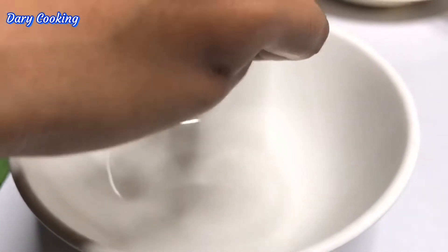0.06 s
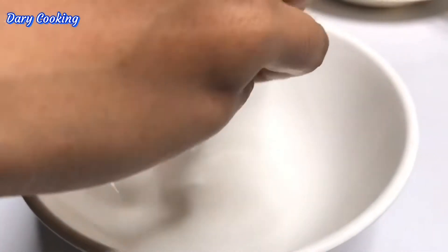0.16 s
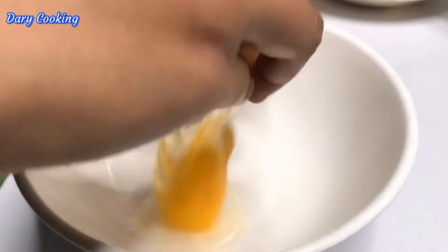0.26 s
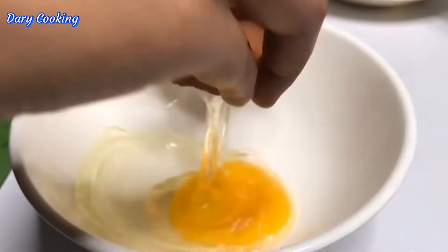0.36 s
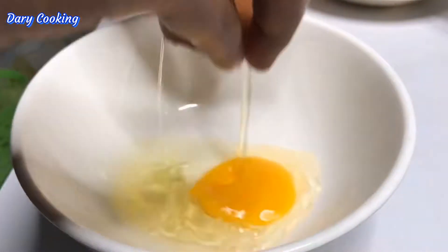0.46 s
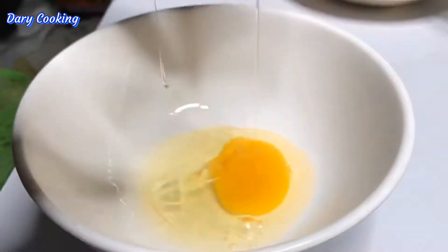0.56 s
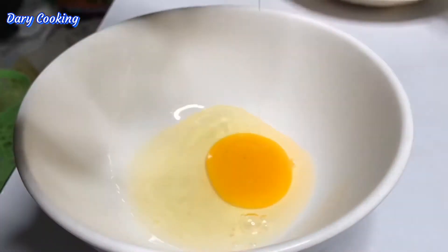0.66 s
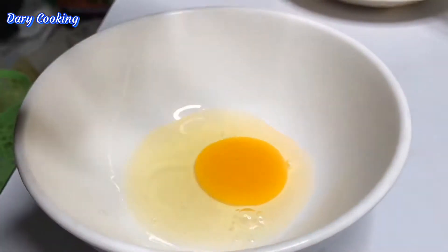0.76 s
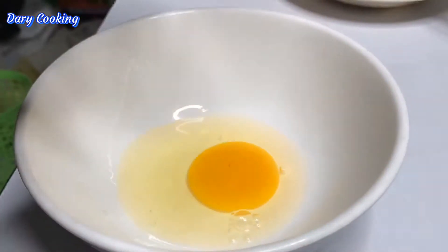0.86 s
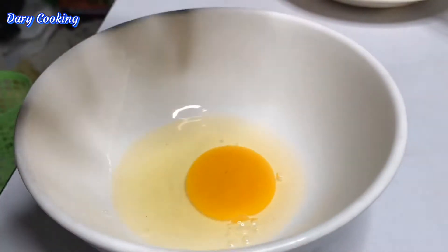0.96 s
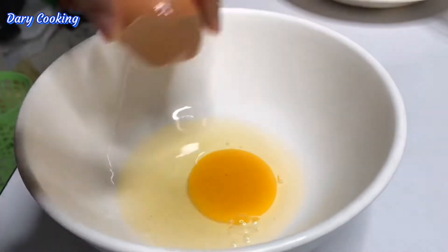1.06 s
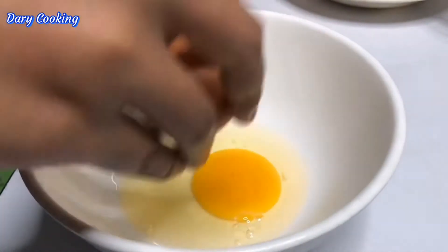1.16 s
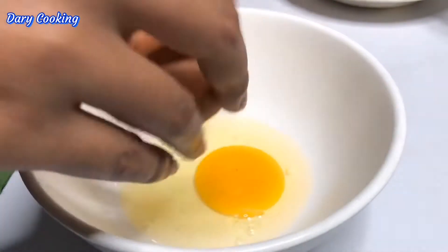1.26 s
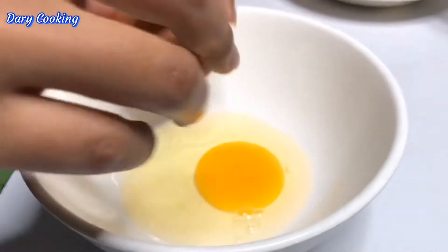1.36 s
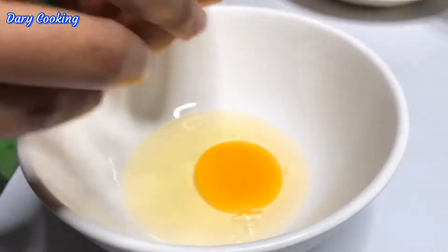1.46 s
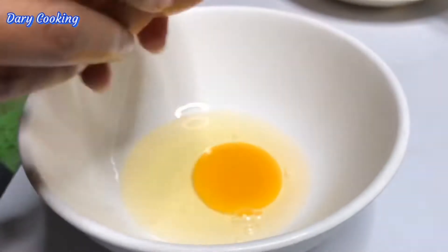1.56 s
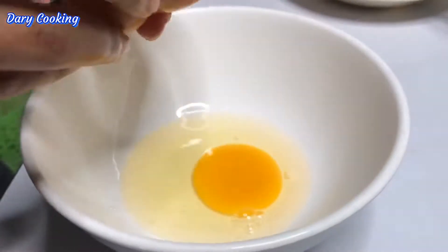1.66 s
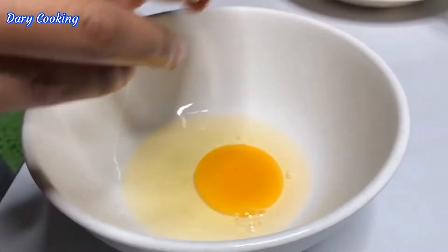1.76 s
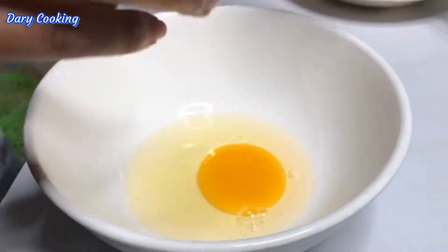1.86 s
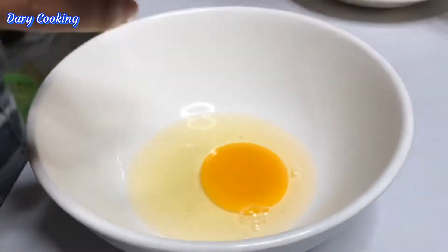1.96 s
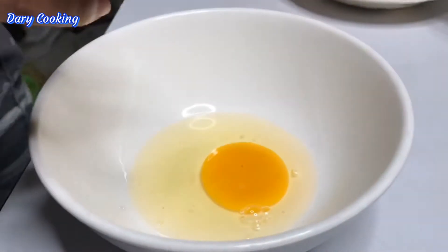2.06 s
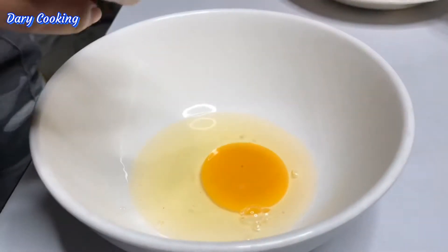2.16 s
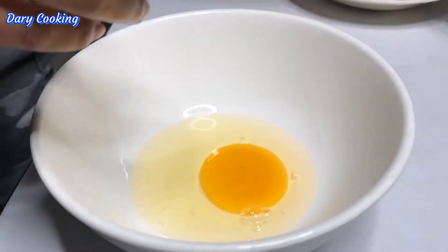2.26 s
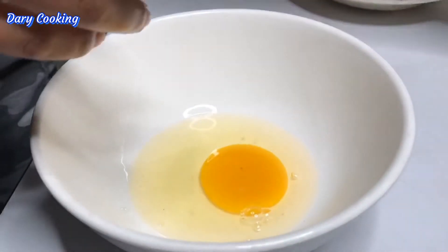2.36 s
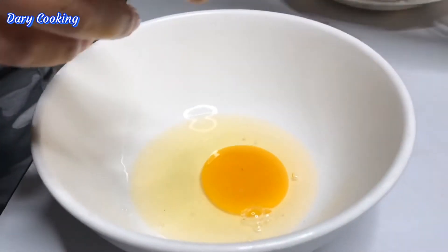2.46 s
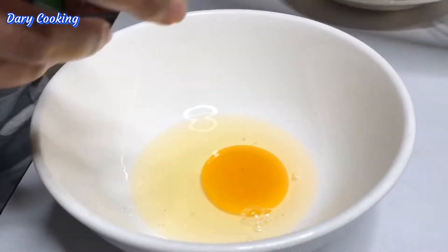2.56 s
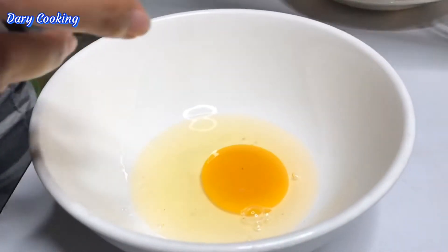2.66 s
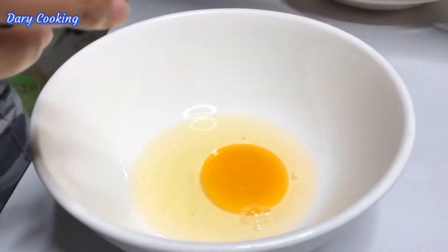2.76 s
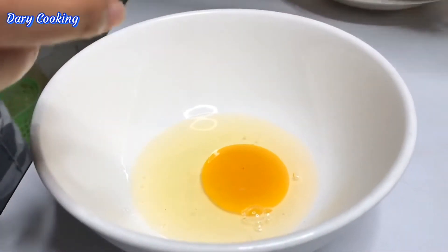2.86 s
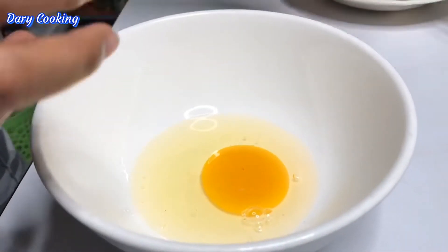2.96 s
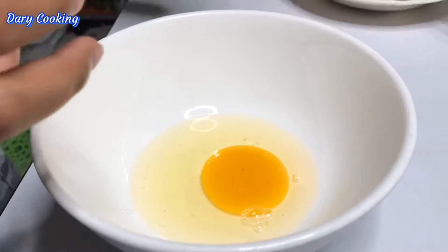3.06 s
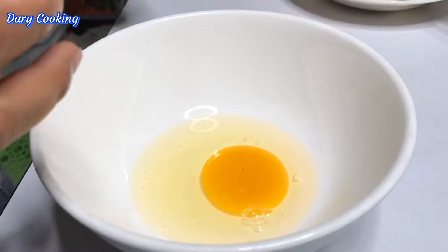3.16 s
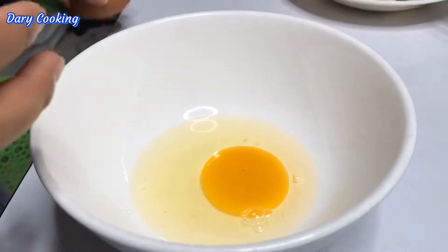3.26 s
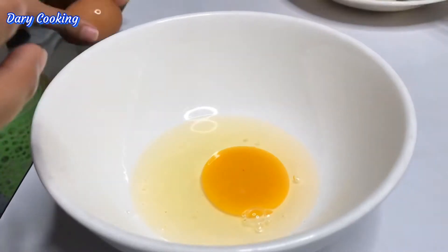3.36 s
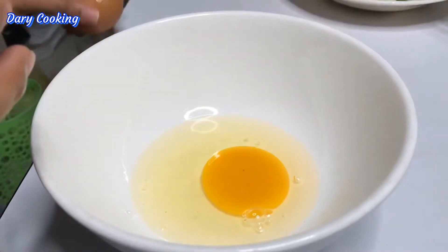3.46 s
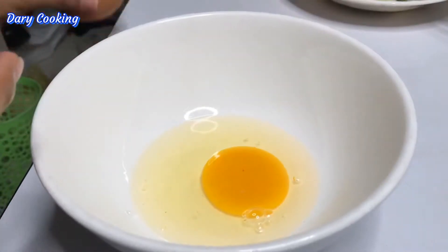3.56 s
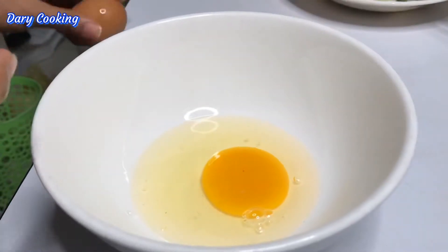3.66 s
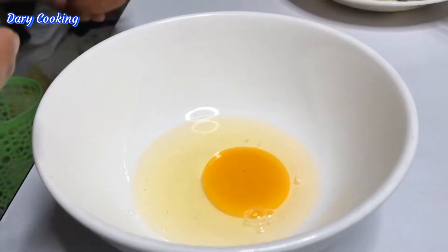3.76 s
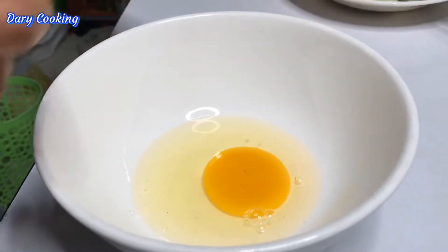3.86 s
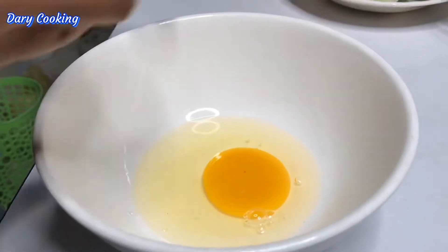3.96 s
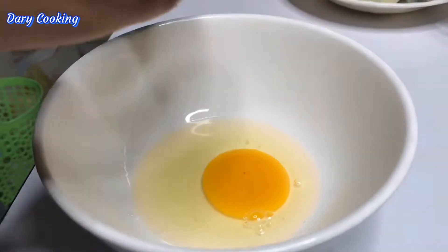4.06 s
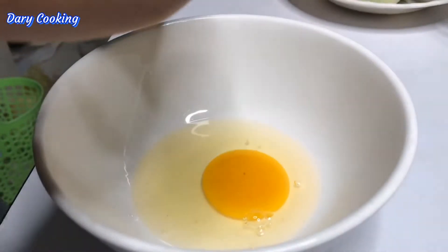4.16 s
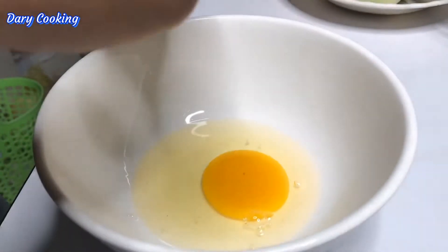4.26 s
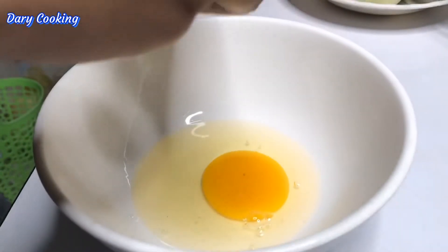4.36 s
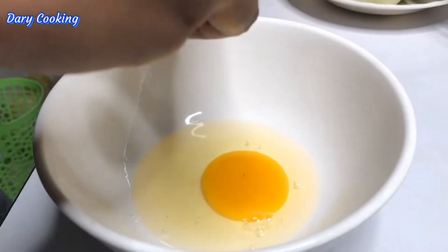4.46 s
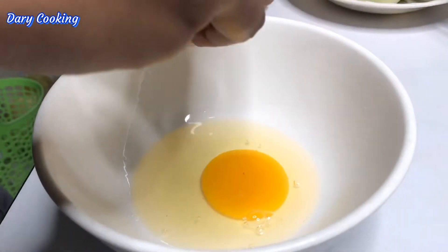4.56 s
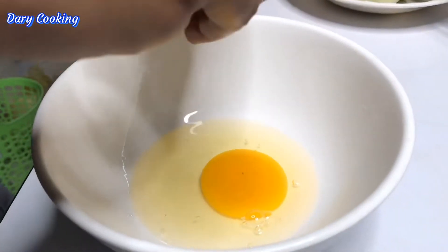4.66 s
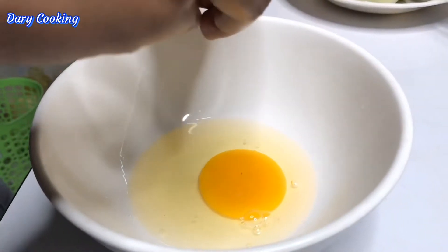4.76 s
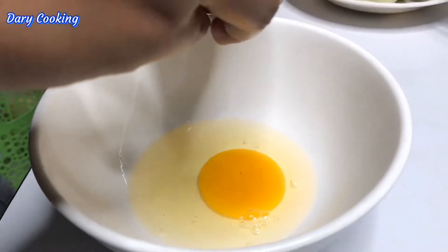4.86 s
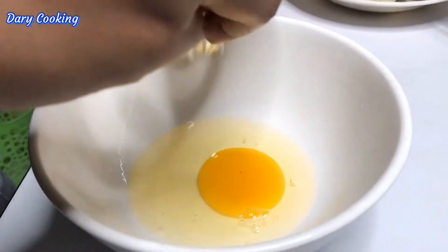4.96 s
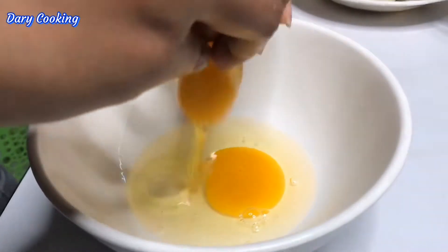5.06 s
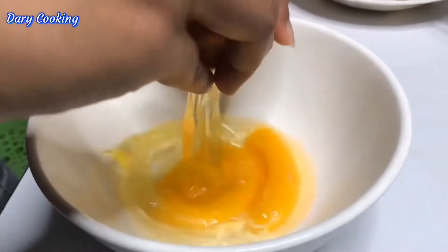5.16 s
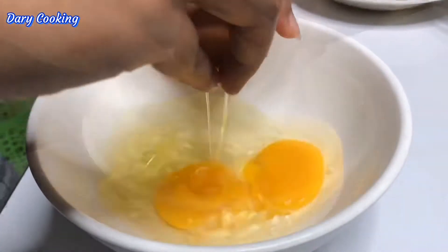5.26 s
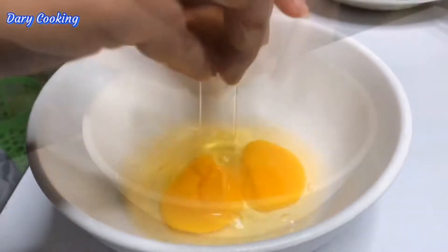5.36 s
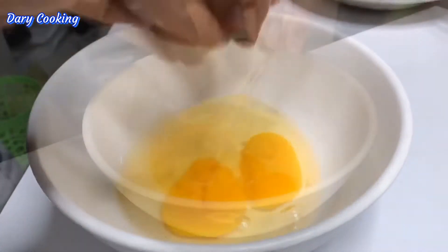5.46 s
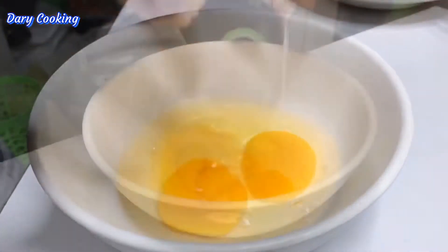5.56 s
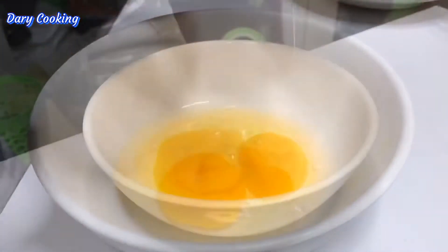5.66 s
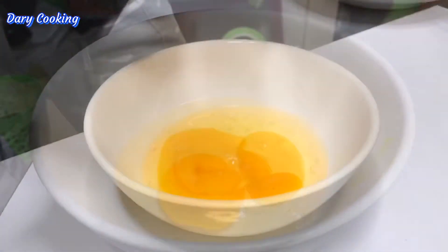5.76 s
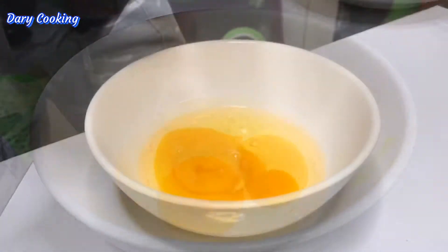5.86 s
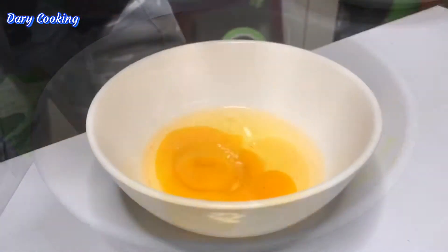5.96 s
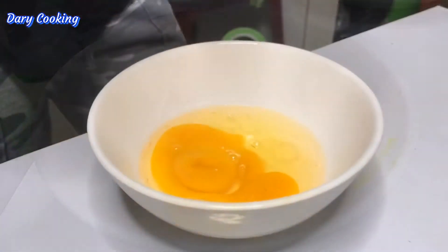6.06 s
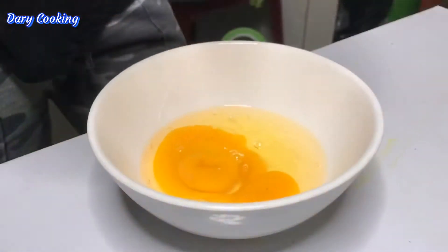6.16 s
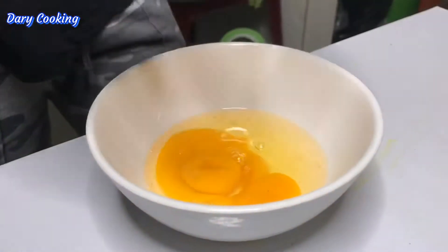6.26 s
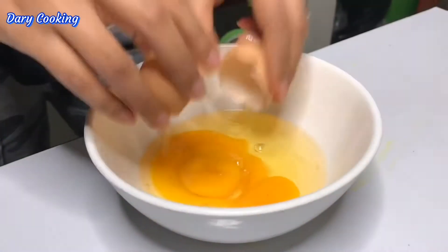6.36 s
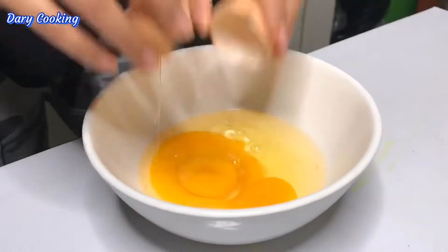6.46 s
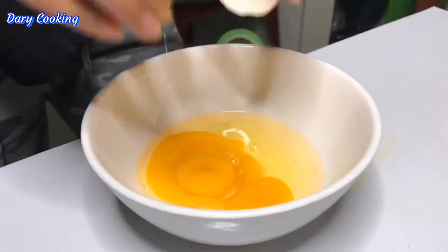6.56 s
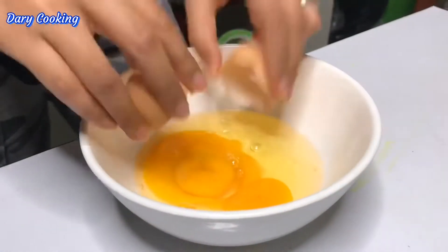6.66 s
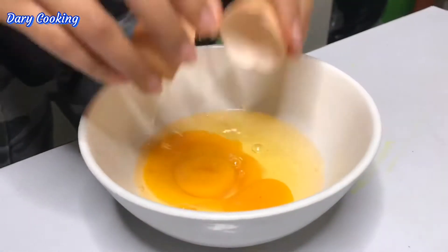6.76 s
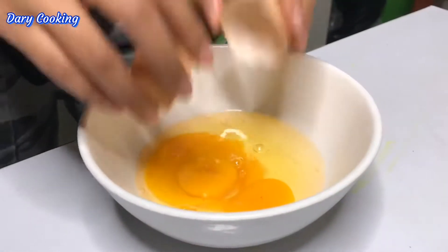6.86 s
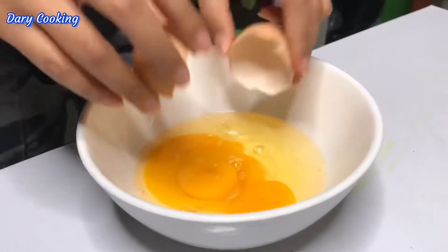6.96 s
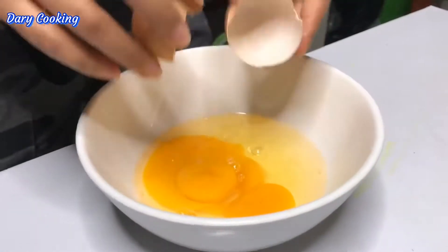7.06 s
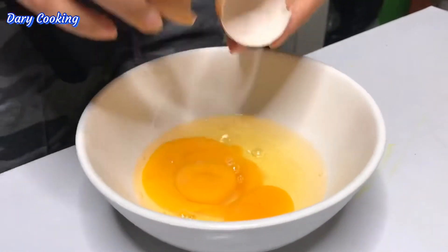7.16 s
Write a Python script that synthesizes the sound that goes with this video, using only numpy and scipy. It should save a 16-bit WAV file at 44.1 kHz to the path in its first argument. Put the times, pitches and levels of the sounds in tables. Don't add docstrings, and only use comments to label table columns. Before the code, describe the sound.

Close up in a small kitchen, an egg is knocked twice, its shell cracks open crisply, the yolk plops into a bowl and shells crackle.

```python
import sys
import numpy as np
from scipy import signal
from scipy.fft import rfft, irfft, next_fast_len
from scipy.io import wavfile
from scipy.ndimage import uniform_filter1d, map_coordinates

SR = 44100
rng = np.random.default_rng(int(sys.argv[2]) if len(sys.argv) > 2 else 0)


def wav_out(sig):
    wavfile.write(sys.argv[1], SR, np.round(np.clip(np.atleast_2d(sig).T, -1, 1) * 32767).astype(np.int16))


def linear_from_db(decibels):
    return 10 ** (np.asarray(decibels, float) / 20)


N = 317719

# (time [s], peak [dB], ring [Hz], brittle top above ring [dB])
SNAPS = [(0.0681, -32, 1540, -12), (0.069, -39, 3250, -9), (0.205, -43, 2800, -9), (0.168, -54, 2400, 26),
         (0.2165, -26, 1930, -0.5), (0.221, -32, 1750, -20), (0.2394, -41, 2780, -23),
         (0.2898, -34.5, 3420, 1.5), (0.951, -47, 1940, -3), (1.1563, -37.5, 1940, 8),
         (1.2672, -41, 1290, -3), (1.401, -29, 2780, -2), (1.4055, -23.5, 2940, 4.5),
         (1.4053, -31, 2130, -9), (1.4125, -33, 2180, -9), (1.4225, -32.5, 2100, -9), (1.412, -24, 2800, 1),
         (1.443, -36, 2280, 9), (1.453, -38, 2200, 6), (1.461, -39, 2600, 6), (1.422, -24, 2800, -1),
         (1.4268, -27, 2760, -2), (1.439, -35.5, 2870, 7), (1.4478, -31.5, 2840, 0), (1.6284, -29, 2090, 9),
         (1.628, -36, 3010, 5), (1.912, -45, 2210, -15), (2.36, -45, 3280, -18), (3.978, -43, 2160, 15),
         (4.23, -30.5, 1670, 3), (4.265, -39.5, 1848, 6), (4.2696, -42, 1580, 16.5),
         (4.289, -47.5, 2170, 12)]
# (time [s], peak [dB], ring [Hz], brittle top above ring [dB])
OPENING = [(4.7474, -44, 3670, 12.5), (4.7705, -37, 3580, -1), (4.775, -16, 3210, -5),
           (4.7865, -17, 1750, -3), (4.7925, -14.5, 2300, -8), (4.8142, -25, 1300, -14),
           (4.8367, -29, 3000, 6), (4.8075, -32, 2600, 7), (4.873, -40, 3150, 12), (4.7904, -11, 2520, 1.5),
           (4.7969, -12, 1700, -2), (4.801, -23, 2100, -2), (4.817, -23.5, 1700, 10),
           (4.819, -30, 2600, 14), (4.822, -22.5, 1540, 14.5), (4.825, -25, 1600, 13),
           (4.8283, -17, 3300, 5), (4.8484, -41, 2600, -4), (4.87, -38, 3150, 14.5),
           (4.8808, -33, 3460, 10), (4.8833, -23.5, 1620, 2), (4.889, -26, 1630, -3),
           (4.901, -22, 2300, -36), (4.905, -29, 2700, -17), (4.9103, -31, 2200, -17),
           (4.892, -32, 2600, -6), (4.886, -30, 3000, 2), (4.9157, -29, 2110, -2), (4.9487, -36, 2120, 4),
           (4.9551, -28, 3380, 0.5), (4.9722, -35.5, 2200, -5), (5.01, -47.5, 3460, 11)]
# (time [s], peak [dB], ring [Hz], brittle top above ring [dB])
EMPTIED = [(5.102, -29, 1810, 0), (5.1344, -41, 5100, -3), (5.142, -49, 5200, -12),
           (5.2021, -33.5, 1970, 5.5), (5.254, -41, 1390, 3), (5.256, -54, 4800, -9),
           (5.3742, -31.5, 2600, 4.5), (5.359, -38, 3000, 6), (5.4058, -39, 3050, 7),
           (5.412, -44, 3000, 10.5), (5.49, -48.5, 3020, 7)]
# (time [s], peak [dB], ring [Hz], brittle top above ring [dB])
DROPPED = [
    (2.0394, -43, 2100, 6),
    (2.051, -26.5, 1660, 4),
    (2.0522, -25, 2600, -1),
    (2.0565, -33, 1900, -2),
    (2.0593, -28, 2500, -2),
    (2.0735, -48, 1900, 10),
]
# (time [s], peak [dB], ring [Hz], rub t60 [s], top above ring [dB])
RUBS = [(5.065, -47, 2170, 0.07, 3), (5.924, -39, 2020, 0.18, -14), (6.358, -31.5, 2340, 0.077, -14),
        (6.518, -34, 1340, 0.17, -18), (6.5515, -35.5, 1760, 0.2, -21), (6.5994, -44, 4780, 0.07, -15),
        (6.6578, -38, 1650, 0.11, -15), (6.6853, -35, 1950, 0.21, -19), (6.772, -49, 1950, 0.07, -12),
        (6.9937, -40, 2220, 0.054, -6), (7.0594, -41.5, 3740, 0.082, -12), (7.1362, -37.5, 3800, 0.091, -1)]
# (time [s], peak [dB])
FINGER_TICKS = [(0.058, -45), (0.145, -47), (0.318, -46), (0.332, -37), (0.339, -45), (0.577, -42),
                (1.542, -40), (1.585, -40), (1.677, -39), (1.989, -44), (2.2946, -42), (2.808, -42.5),
                (4.1834, -45), (4.727, -44), (5.047, -41), (5.173, -35)]
# (peak time [s], level [dB], top above cup [dB], rise [s], fall [s])
CRUMBLE = [
    (2.049, -30.5, -1.5, 0.0089, 0.072),
    (4.24, -62, 9, 0.029, 0.13),
    (4.326, -68.5, 15.5, .025, 0.033),
    (4.793, -21.5, -1.5, 0.016, 0.019),
    (4.826, -32, 8.5, 0.037, 0.019),
    (4.887, -27.5, -15, 0.0073, 0.041),
    (4.952, -44, -21, .03, .045),
]
# (peak time [s], level [dB], top above cup [dB], rise [s], fall [s])
GRATING = [
    (1.408, -41, 3, 0.0087, .08),
    (1.445, -37, 5.5, 0.041, 0.042),
    (5.318, -44.5, 0, 0.02, 0.37),
    (5.404, -36, -3.5, 0.12, 0.038),
]
# (centre [Hz], width [Hz], level [dB])
EMPTY_CUP = [(2500, 810, -4.5), (3110, 320, 2)]

# (time [s], worktop peak [dB], dented shell peak [dB], boom [dB], boom top [Hz])
KNOCKS = [
    (3.24, -14.5, -13, -45, 402),
    (3.244, -4.5, -14.5, -24.5, 305),
    (3.4967, -25, -21, -55, 2500),
    (3.4974, -22, -2, -41, 2500),
    (3.5013, -9, -18, -24.5, 660),
    (1.157, -35, -33, -40, 800),
    (2.049, -39, -36, -43, 2020),
    (4.79, -57, -52, -42, 1700),
    (3.5062, -28, -17, -36, 1300),
]
KNOCK_CONTACT = [0.00044, 0.00013, .0001, 0.00018, 0.00037, .0002, .0002, .0002, .00015]
# (frequency [Hz], level [dB], t60 [s])
WORKTOP = [(149, -9.5, 0.045), (203, -9, 0.044), (263, 4, 0.046), (330, -2.5, 0.059), (422, -4.5, 0.035)]
# (frequency [Hz], level [dB], t60 [s])
WHOLE_EGG = [(544, -0.5, 0.017), (686, 0.5, 0.014), (880, -1, 0.013), (1120, -3.5, 0.017),
             (1590, -5.5, .015), (1900, -9.5, 0.0089)]
# (frequency [Hz], level [dB], t60 [s])
CRACKED_EGG = [(606, -8.5, 0.017), (758, 3, 0.016), (1120, -4.5, 0.015), (1590, -8, 0.016),
               (2230, -1.5, 0.0055)]
# (centre [Hz], width [Hz], level [dB])
CUPBOARD = [(140, 14, 0), (258, 25, 2), (322, 30, -6.5), (452, 40, -12), (604, 67, -15), (740, 54, -13.5),
            (1100, 65, -17)]
# (frequency [Hz], level [dB], t60 [s])
BOWL_SONG = [(57, -24, .2), (145, -32, 0.35), (258, -28.5, 0.41), (470, -35.5, 0.38), (570, -32, .3),
             (620, -34.5, 0.29), (730, -34, 0.25), (778, -35, 0.23), (880, -41, 0.22), (1120, -33, .2),
             (1230, -38, .3), (1448, -38, 0.19)]
# (time [s], frequency [Hz], peak [dB], t60 [s])
JOLT_SONG = [(3.245, 258, -22, .5), (3.245, 236, -26, .25), (3.245, 140, -25, .21), (3.245, 190, -24, .12),
             (3.245, 322, -27, .3), (3.245, 390, -28, .12), (3.245, 880, -30, .06), (3.6, 270, -44, 1.1),
             (1.158, 770, -33, .09), (1.158, 1130, -39, .07), (1.17, 205, -38, .2), (1.4, 240, -44, .4)]

# (time [s], peak [dB], frequency [Hz], t60 [s], pitch rise [share])
BUBBLES = [
    (0.061, -38.5, 1230, 0.035, 0.16),
    (0.317, -34.5, 902, 0.035, 0.11),
    (0.332, -33.5, 923, 0.039, 0.16),
    (0.406, -34.5, 920, 0.06, 0.096),
    (5.1, -35.5, 1777, 0.06, 0.078),
    (5.116, -32.5, 1790, 0.042, 0.17),
    (5.256, -47.5, 1120, 0.09, 0.097),
    (5.396, -37, 1190, 0.029, 0.11),
]
# (time [s], peak [dB], frequency [Hz], t60 [s], pitch rise [share])
PLOP = [
    (5.1755, -21.5, 1580, 0.029, 0.18),
]
# (time [s], level [dB])
ROCK = [
    (5.05, -62),
    (5.136, -44.5),
    (5.294, -47.5),
    (5.322, -43.5),
    (5.402, -62),
    (5.42, -60),
]
# (centre [Hz], width [Hz], level [dB])
BOWL = [(213, 6.9, 5), (371, 6.6, -9.5)]

# (start [s], level [dB], hold [s], middle [dB], top [dB])
DRAGS = [
    (0.318, -48.5, 0.015, -14, -8.5),
    (0.406, -47, 0.1, -4, -10),
    (0.539, -42.5, 0.059, -11, -4),
    (0.948, -45, 0.0065, -9.5, -13),
    (1.159, -37.5, 0.0045, -11, -7.5),
    (1.268, -41, 0.037, -14.5, -6.5),
]
# (centre [Hz], width [Hz], level [dB])
EARLY_DISHES = [
    [(320, 47, -1), (830, 80, -2.5), (2120, 100, -7)],
    [(450, 44, 2), (524, 55, -6), (930, 71, -3), (1230, 83, 3.5), (1670, 88, -4.5), (2170, 64, 1),
     (2760, 66, -5), (3130, 26, -3), (3600, 45, -10)],
    [(554, 67, -1.5), (700, 34, -3), (973, 40, -1), (1115, 28, 7), (1620, 37, 1), (1826, 20, 3),
     (2060, 100, -1), (2400, 64, 3.5), (2760, 100, 3), (3630, 40, -6)],
]
# (centre [Hz], width [Hz], level [dB])
LATER_DISHES = [
    [(487, 130, -4), (677, 31, -1.5), (1088, 17, 4.5), (1620, 13, 3.5), (1950, 30, -2), (3020, 34, -1),
     (3670, 33, -11), (4280, 50, -17)],
    [(232, 16, 15), (470, 43, -21), (772, 31, -0.5), (1120, 69, -3), (1930, 60, -10), (2940, 35, 0.5)],
    [(234, 43, 7.5), (346, 76, 0), (755, 24, 4.5), (1120, 34, 1.5), (2200, 200, 0), (2660, 90, 1)],
]
# (time [s], peak [dB], frequency [Hz], t60 [s])
SNAGS = [(.365, -52, 2100, 0.055), (.407, -30, 450, 0.045), (.417, -42.5, 2100, 0.079),
         (.455, -44, 1245, .06), (.462, -40.5, 530, .06), (.479, -43.5, 3130, 0.13),
         (.515, -50, 3600, 0.088), (.533, -38, 1145, .08), (.556, -30.5, 522, 0.068),
         (.558, -37, 1140, .05), (.57, -41, 2000, 0.066), (.578, -38, 1140, .06), (.61, -39, 1116, 0.065),
         (.614, -35, 700, 0.059), (.655, -46, 1100, .06)]

# (time [s], level [dB])
HANDS = [(0, -58.5), (0.27, -73), (0.75, -67.5), (1.45, -69.5), (1.93, -65.5), (2.1, -62.5), (2.3, -64.5),
         (2.65, -67), (3.5, -70), (3.65, -68.5), (4.2, -67.5), (4.6, -68.5), (4.9, -61), (5.28, -68),
         (5.5, -66), (5.75, -57.5)]
# (time [s], level [dB])
REACH = [
    (5.75, -59),
    (6.1, -56),
    (6.5, -52),
]
# (time [s], level [dB])
BUSY = [
    (6.501, -55.5),
    (6.9, -53.5),
    (7.205, -52),
]

# (frequency [Hz], density [dB per Hz])
AIR = [(110, -31.5), (200, 3), (556, -7), (1250, -13), (2520, -19.5), (2830, -39.5), (8160, -35.5),
       (10500, -66)]
# (centre [Hz], width [Hz], level [dB])
HUM = [(104.6, 3, -53), (150, 5.4, -63.5), (258, 10, -62), (734, 3.5, -76.5), (1566, 9.8, -81.5),
       (4370, 30, -87)]
# (time [s], level [dB])
BACKGROUND_DROP = [
    (0, 0.5),
    (5.4, -1.5),
    (5.75, -6),
    (7.205, -3.5),
]
# (time [s], level [dB])
GRIP = [(0, -49), (0.57, -54.5), (1.26, -58.5), (1.56, -55.5), (1.91, -57), (2.17, -51), (2.6, -60),
        (3.06, -56), (3.45, -52), (4.13, -61.5), (4.95, -59), (5.38, -56.5), (5.77, -46.5), (6.13, -37),
        (6.55, -47.5), (6.83, -39), (7.205, -45.5)]
# (time [s], peak [dB], frequency [Hz], t60 [s])
GRIP_BUMPS = [(6.036, -19, 64, 0.033), (6.087, -15, 115, 0.032), (6.099, -13, 154, 0.026),
              (6.17, -30, 61.5, 0.075), (6.21, -17.5, 115, 0.032), (6.29, -24, 145, 0.032),
              (6.428, -20.5, 74, 0.033), (6.687, -13.5, 62, 0.025), (6.759, -39, 70.0, 0.074),
              (6.885, -28, 64.6, 0.16), (7.036, -23, 80.7, 0.056)]
# (frequency [Hz], t60 [s])
KITCHEN = [(150, 0.65), (700, 0.38), (2500, 0.32), (9000, 0.31)]
# (frequency [Hz], level [dB])
MIC = [(48, 1.5), (9900, 6), (10200, -11.5), (10600, -25), (11200, -54), (12000, -70)]


def unit(x):
    return x / np.sqrt(np.mean(x ** 2) + 1e-20)


def along(points, hz):
    f, v = np.transpose(points)
    return np.interp(np.log(hz + 1), np.log(f + 1), v)


def level_curve(*spans):
    t = np.arange(N) / SR
    out = np.full(N, -150.)
    for rows in spans:
        s, db = np.transpose(rows)
        inside = (t >= s[0]) & (t <= s[-1])
        out[inside] = np.interp(t[inside], s, db)
    return out


def wobble(rate, size=N):
    knots = rng.standard_normal(int(size * rate / SR) + 4)
    return map_coordinates(knots, [np.arange(size) * rate / SR])


def filtered(x, response):
    m = next_fast_len(len(x) + SR // 2)
    return irfft(rfft(x, m) * response(np.fft.rfftfreq(m, 1 / SR)), m)[:len(x)]


def modes(peaks):
    def response(f):
        total = 0
        for k, (hz, width, db) in enumerate(peaks):
            total = total + (-1) ** k * linear_from_db(db) * 1j * f * width / (hz * hz - f * f + 1j * f * width)
        return total
    return response


def band(lo_hz, hi_hz):
    return lambda f: (1j * f / (lo_hz + 1j * f)) ** 3 * (hi_hz / (hi_hz + 1j * f)) ** 2


def grit(spiky_db, rate):
    return rng.standard_normal(N) * linear_from_db(spiky_db * wobble(rate))


def patchy(x, depth_db):
    z = signal.stft(x, nperseg=512)[2]
    field = uniform_filter1d(uniform_filter1d(rng.standard_normal(z.shape), 7, 0), 9, 1)
    return unit(signal.istft(z * linear_from_db(depth_db * unit(field)), nperseg=512)[1][:N])


def add(track, s, sound):
    part = track[round(s * SR):][:len(sound)]
    part += sound[:len(part)]


def ring(hz, t60, t, attack, rise=0):
    glide = t60 / 3
    phase = 2 * np.pi * hz * (t + rise * glide * (t / glide - 1 + np.exp(-t / glide)))
    return np.sin(phase) * linear_from_db(-60 * t / t60) * (1 - np.exp(-t / attack))


def shell():
    cup, top, t = np.zeros(N), np.zeros(N), np.arange(SR // 10) / SR
    snap_t60 = 0.012
    contacts = []  # (s, dB, Hz, t60, top dB, ring damping s, rise s)
    for s, db, hz, top_db in SNAPS + OPENING + EMPTIED + DROPPED:
        contacts.append((s, db, hz, snap_t60, top_db, snap_t60, 1e-5))
    for s, db, hz, t60, top_db in RUBS:
        contacts.append((s, db, hz, t60, top_db, 0.007, 0.0031))
    for s, db, hz, t60, top_db, damped, rise in contacts:
        noise = rng.standard_normal(len(t))
        onset = 1 - np.exp(-t / rise)
        neighbour_hz = hz * (1.173 + 0.11 * rng.standard_normal())
        tone = ring(hz, 0.75 * damped, t, attack=0.00027)
        tone += 0.3 * ring(neighbour_hz, 0.42 * damped, t, attack=0.0002)
        tearing = noise * linear_from_db(-60 * t / (t60 - 0.48 * damped)) * onset
        burst = signal.fftconvolve(tone, tearing)[:len(t)]
        add(cup, s, linear_from_db(db + 0.2) * burst / np.abs(burst).max())
        click = 2.4 * (np.abs(t - 0.0001) < .5 / SR)
        spit = (0.81 * noise[::-1] + click) * linear_from_db(-60 * t / (0.0063 + 0.61 * t60)) * onset
        add(top, s, linear_from_db(db + top_db + 3.5) * spit)
    for s, db in FINGER_TICKS:
        add(top, s, linear_from_db(db - 60 * t / 0.018) * rng.standard_normal(len(t)))
    crackle = crumbs(CRUMBLE, [(1840, 450, -3.0), (2600, 1560, -9)], spiky_db=-0.5, top_spiky_db=4.0)
    crackle += crumbs(GRATING, EMPTY_CUP, spiky_db=0.5, top_spiky_db=3.5)
    gap = lambda f: 1 - 0.48 * modes([(4500, 1300, 0)])(f)
    brittle = filtered(filtered(top, band(4060, 8600)) + crackle, gap)
    return filtered(cup, band(980, 9000)), brittle


def crumbs(rows, cup_modes, spiky_db, top_spiky_db):
    now = np.arange(N) / SR
    cup_gains, top_gains = [], []
    for s, db, top_db, rise, fall in rows:
        lost = 26.5 * np.maximum((s - now) / rise, (now - s) / fall)
        cup_gains.append(linear_from_db(db - lost))
        top_gains.append(linear_from_db(db + top_db - 0.89 * lost))
    cup = unit(filtered(grit(spiky_db, 340), modes(cup_modes)))
    top = unit(filtered(grit(top_spiky_db, 760), band(3900, 9200)))
    return linear_from_db(-8.5) * np.max(cup_gains, axis=0) * cup + linear_from_db(-5.5) * np.max(top_gains, axis=0) * top


def knocks():
    out, t = np.zeros(N), np.arange(SR // 2) / SR
    break_s = 3.4967
    struck = lambda part: -sum(linear_from_db(db) * ring(hz, t60, t, attack=0.0011) for hz, db, t60 in part)
    wood, whole, cracked = struck(WORKTOP), struck(WHOLE_EGG), struck(CRACKED_EGG)
    for (s, wood_db, egg_db, boom_db, top_hz), contact in zip(KNOCKS, KNOCK_CONTACT):
        hollow = lambda f: band(90, top_hz)(f) * (modes(CUPBOARD)(f) + linear_from_db(-10.0))
        boom = unit(filtered(rng.standard_normal(len(t)), hollow))
        boom_decay = linear_from_db(-60 * t / 0.19) + linear_from_db(-17 - 60 * t / 0.82)
        boom *= linear_from_db(boom_db) * boom_decay * (1 - np.exp(-t / 0.0008))
        egg = whole if s < break_s - .1 else cracked
        dent = filtered(linear_from_db(egg_db) * egg, lambda f: 1 / (1 + 1j * f * contact) ** 2)
        crack = linear_from_db(egg_db - 19 - 60 * t / 0.015) * rng.standard_normal(len(t))
        add(out, s, linear_from_db(wood_db - 4.5) * wood + boom + dent + crack)
    split = rng.standard_normal(len(t)) + 10 * (np.abs(t - 0.0004) < .5 / SR)
    add(out, break_s, linear_from_db(-13.5 - 60 * t / 0.0095) * filtered(split, band(300, 15000)))
    return filtered(out + singing_on(), lambda f: 1j * f / (45 + 1j * f))


def singing_on():
    out, t = np.zeros(N), np.arange(SR // 2) / SR
    for hz, db, t60 in BOWL_SONG:
        add(out, 3.5, linear_from_db(db + 3.5 * wobble(46, size=len(t))) * ring(hz, t60, t, attack=0.0053))
    for s, hz, db, t60 in JOLT_SONG:
        add(out, s, linear_from_db(db) * ring(hz, t60, t, attack=0.006) * (1 - t / t[-1]))
    return out


def white_and_yolk():
    drops, t = np.zeros(N), np.arange(SR // 5) / SR
    for s, db, hz, t60, rise in BUBBLES:
        add(drops, s, linear_from_db(db + 3.5) * ring(hz / (1 + rise / 2), t60, t, attack=0.0079, rise=rise))
    for s, db, hz, t60, rise in PLOP:
        closing = 2 * np.pi * hz * (t + rise * (t - 0.0066 * np.tanh(t / 0.0097)))
        swell = (0.36 + t / 0.0073) * linear_from_db(-60 * (t / t60) ** 1.2)
        add(drops, s, linear_from_db(db + 2.0) * np.sin(closing) * swell)
    rocking = unit(filtered(rng.standard_normal(N), modes(BOWL)))
    return drops + linear_from_db(level_curve(ROCK)) * rocking


def sliding():
    out, t = np.zeros(N), np.arange(SR // 2) / SR
    catch_s, fade_db_per_s, dulls_db_per_s = .016, 152, 85
    for (s, db, hold, mid_db, top_db), dish in zip(DRAGS, EARLY_DISHES + LATER_DISHES):
        drag = linear_from_db(db - fade_db_per_s * np.maximum(t - catch_s - hold, 0))
        drag *= np.minimum(t / catch_s, 1) ** 2
        rub = linear_from_db(-13.5) * grit(2.5, 199)[:len(t)]
        for peak in dish:
            contact = rng.standard_normal(len(t)) * linear_from_db(3.4 * wobble(26.0, size=len(t)))
            rub += filtered(contact, modes([peak]))
        low = unit(filtered(rub, band(200, 1410)))
        mid = unit(filtered(rub, band(1500, 1820)))
        top = unit(filtered(rub, band(4500, 1950)))
        add(out, s - catch_s, drag * (low + linear_from_db(mid_db) * mid + linear_from_db(top_db - dulls_db_per_s * t) * top))
    for s, db, hz, t60 in SNAGS:
        add(out, s, linear_from_db(db - 2.5 + 2.5 * wobble(120, size=len(t))) * ring(hz, t60, t, attack=0.0037))
    return out


def hands():
    skin_db = level_curve(HANDS, REACH, BUSY)
    usual_db = skin_db.mean()
    cloth_db = usual_db - 2.5 + 1.203 * (skin_db - usual_db)
    swell = 0.47 * wobble(9)
    skin = patchy(filtered(grit(1.2, 150), band(920, 1130)), depth_db=3.0)
    cloth = patchy(filtered(grit(1.2, 300), band(1400, 9200)), depth_db=2.5)
    return linear_from_db(skin_db + swell) * skin + linear_from_db(cloth_db + swell) * cloth


def grip():
    deep_db = level_curve(GRIP)
    low_db = -54 + 0.45 * (deep_db - deep_db.mean()) + 1.24 * wobble(2.2) + level_curve(BACKGROUND_DROP)
    deep = unit(filtered(rng.standard_normal(N), lambda f: modes([(60, 45, 0)])(f) ** 2))
    low = unit(filtered(rng.standard_normal(N), lambda f: modes([(135, 90, 0)])(f) ** 2))
    out = linear_from_db(deep_db + 2.7 * wobble(12)) * deep + linear_from_db(low_db + 2.8 * wobble(16)) * low
    t = np.arange(SR // 5) / SR
    for s, db, hz, t60 in GRIP_BUMPS:
        add(out, s, linear_from_db(db - 1.0) * ring(hz, t60, t, attack=0.0018))
    return out


def appliances():
    out = linear_from_db(-57.5) * unit(filtered(rng.standard_normal(N), lambda f: linear_from_db(along(AIR, f))))
    for hz, width, db in HUM:
        out += linear_from_db(db) * unit(filtered(rng.standard_normal(N), modes([(hz, width, 0)])))
    return out * linear_from_db(level_curve(BACKGROUND_DROP))


def kitchen(x):
    out, step = np.zeros(N + SR), SR // 3
    for start in range(0, N, step):
        hz, t, z = signal.stft(rng.standard_normal(SR // 2), SR, nperseg=256)
        decay = linear_from_db(-60 * t / along(KITCHEN, hz)[:, None])
        tail = signal.istft(z * decay, SR, nperseg=256)[1]
        echo = signal.fftconvolve(x[start:start + step], tail / np.linalg.norm(tail))
        add(out, start / SR + .005, echo)
    return out[:N]


def scene():
    cup, brittle = shell()
    blows, drops, dishes = knocks(), white_and_yolk(), sliding()
    to_room = linear_from_db(-21) * cup + linear_from_db(-13) * brittle + linear_from_db(-14) * (drops + blows) + linear_from_db(-6.5) * dishes
    near = cup + brittle + drops + blows + dishes
    return (near + kitchen(to_room) + hands() + grip() + appliances())[None]


def roll_off(x):
    return signal.sosfilt(signal.butter(12, 11090, fs=SR, output="sos"), x)


def record(dry):
    rounded = dry[0] / (1 + np.abs(dry[0] / .84) ** 6) ** (1 / 6)
    microphone = lambda f: linear_from_db(along(MIC, f)) * (1j * f / (24 + 1j * f)) ** 2
    mix = filtered(rounded, microphone)[None]
    return roll_off(mix)


dry = scene()
out = record(dry)
wav_out(out)
```